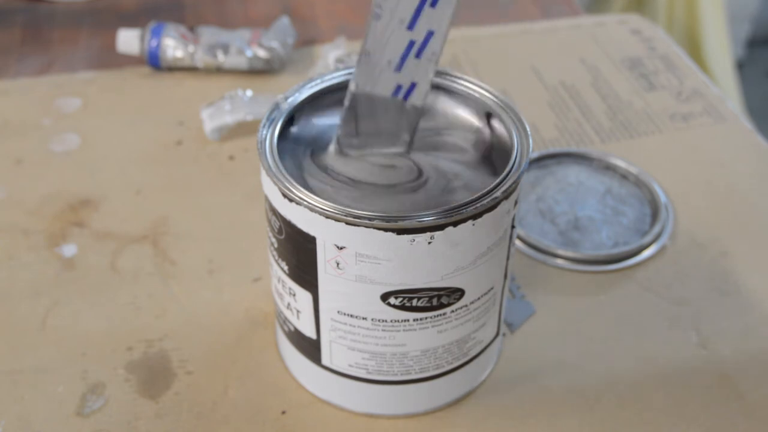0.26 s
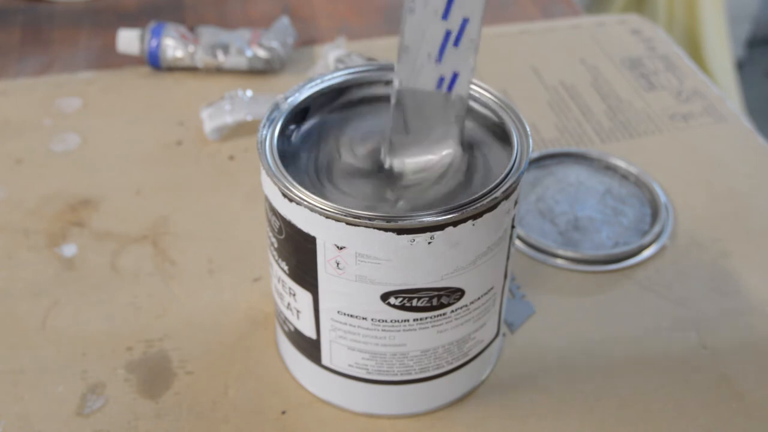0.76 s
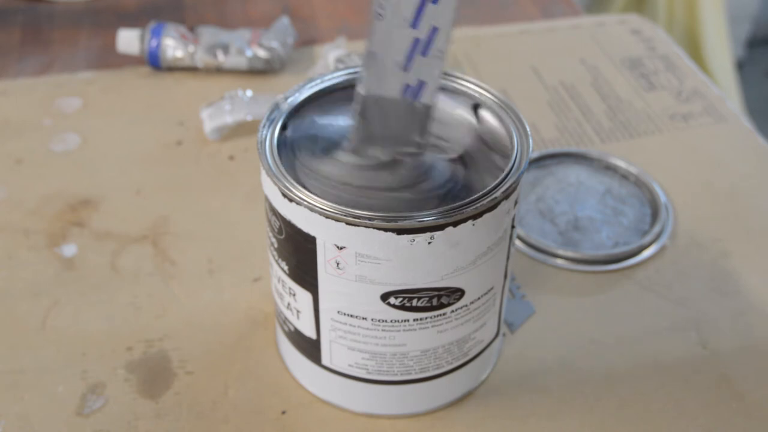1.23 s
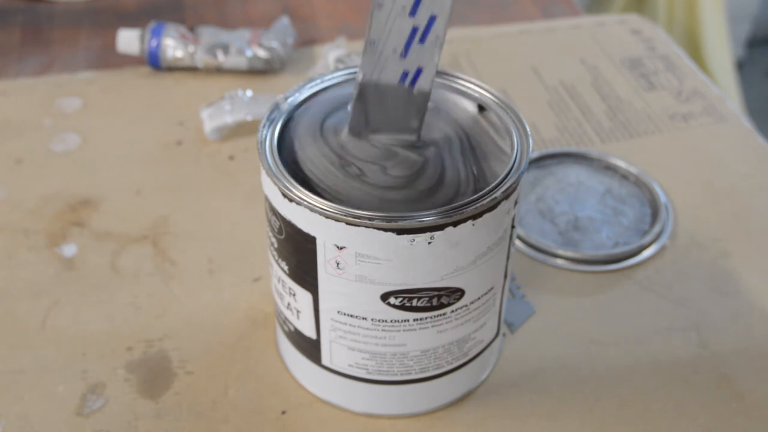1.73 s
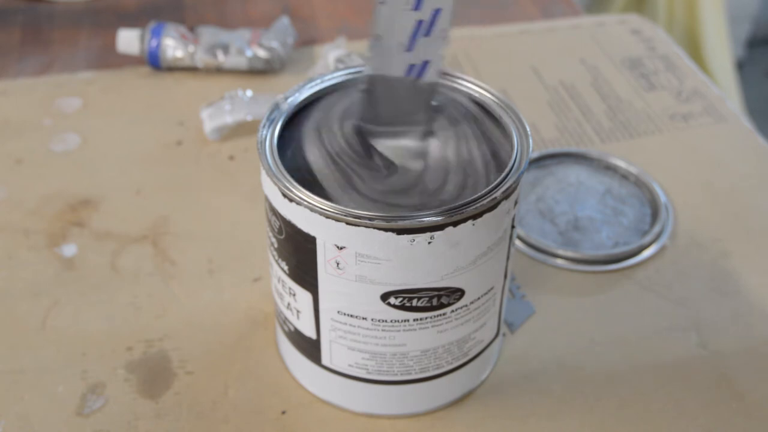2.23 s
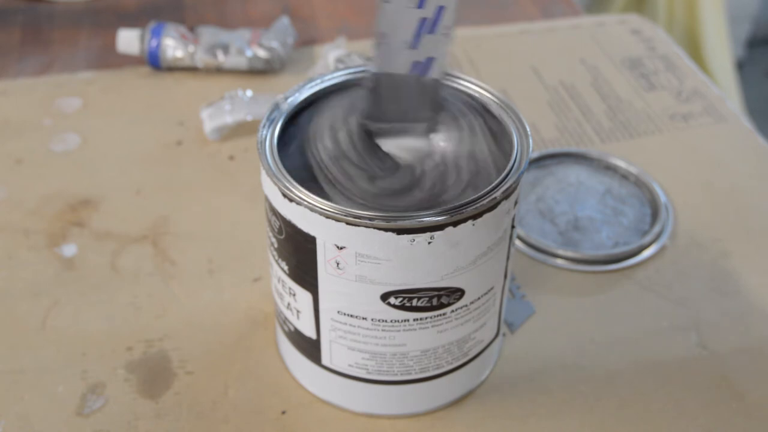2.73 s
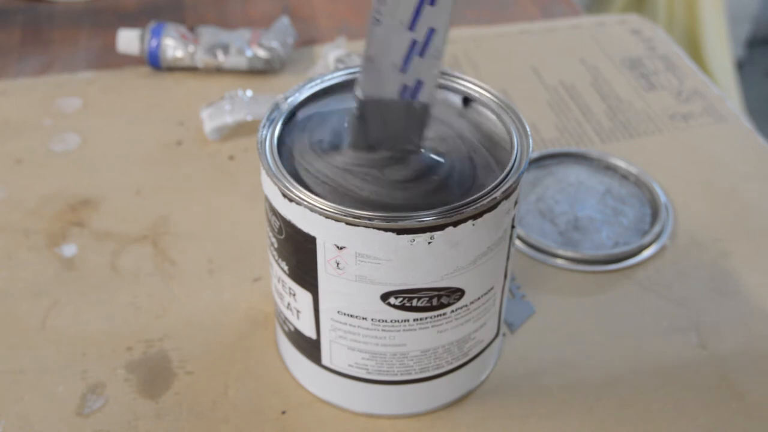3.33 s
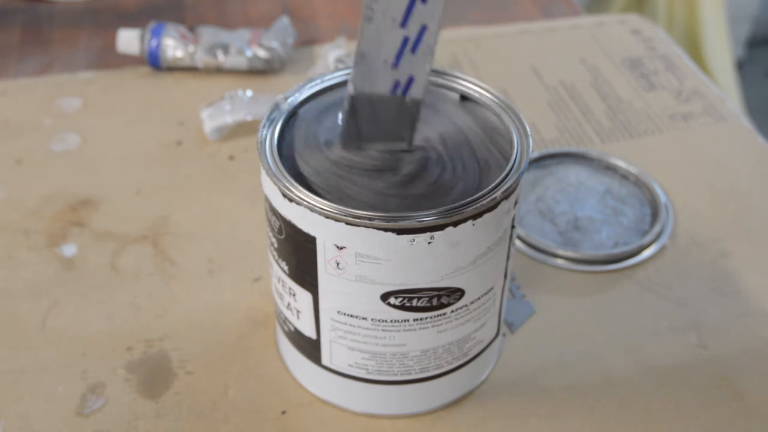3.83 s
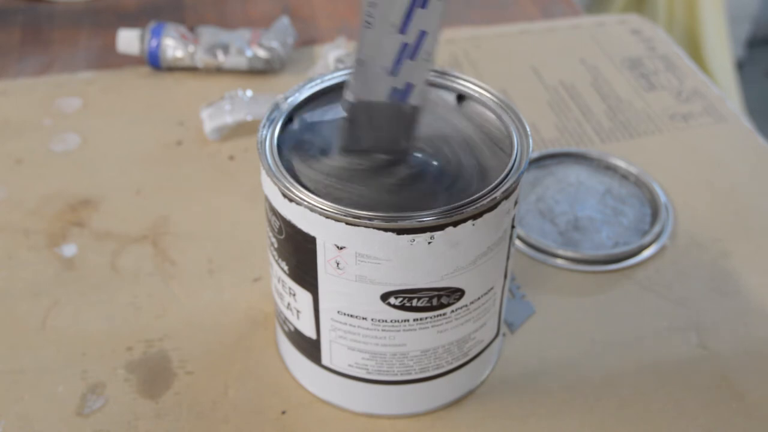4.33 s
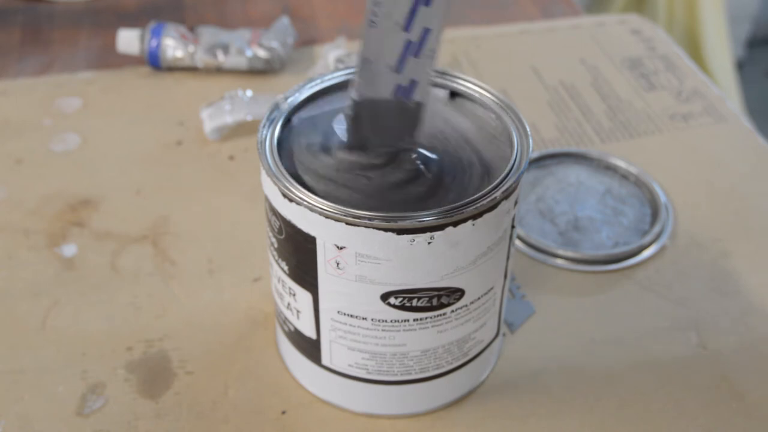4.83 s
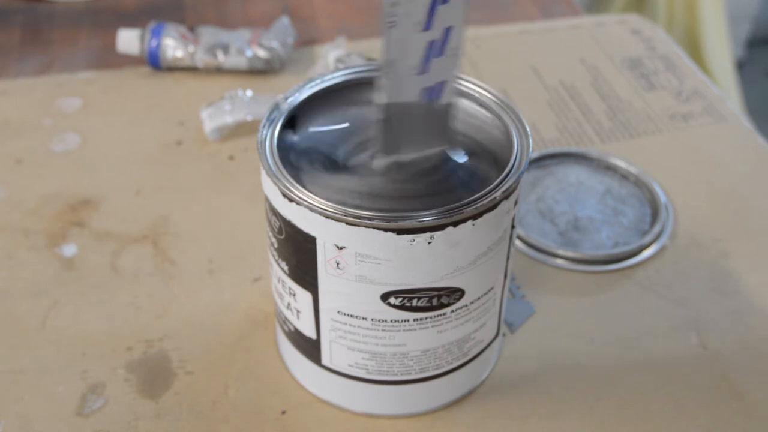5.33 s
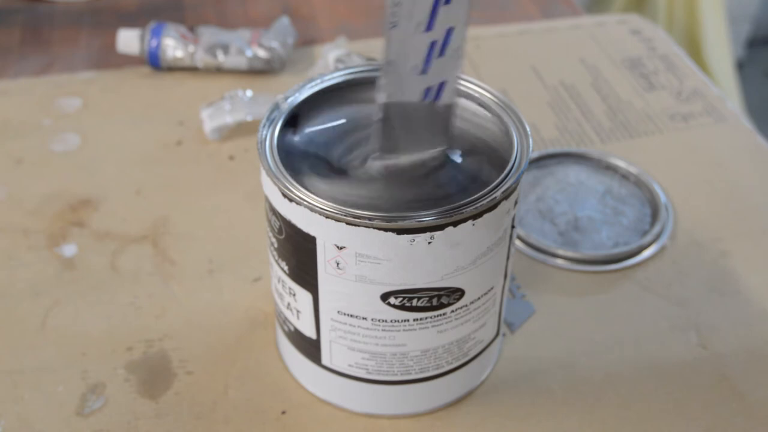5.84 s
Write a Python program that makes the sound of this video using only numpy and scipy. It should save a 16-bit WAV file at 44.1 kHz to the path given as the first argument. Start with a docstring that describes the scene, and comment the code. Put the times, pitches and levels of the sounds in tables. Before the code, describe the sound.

Close up in a small, quiet workshop, a stick scrapes round and round inside a metal can of paint. The raspy back-and-forth strokes have a damped metallic ring and speed up to about four turns a second. Now and then the stick catches with a brief low plop or high chirp. In the second half the strokes get sharper, ending with two low thumps as the can skids on the bench.

```python
"""A flat stick stirs thick paint in a metal tin, close and mono, over the hum of a small workshop.
It starts gently: each turn the edge scrapes the wall, pushing then pulling, while the tip drags over
the bottom. Now and then the stick catches and the tin rings with a brief low plop or high chirp.
The pace rises to about four turns a second. Near 4 s the hand bears down and the pushes begin to slap.
At 5.8 s and 6 s the last two make the tin judder on the bench."""
import sys
import numpy as np
from scipy import signal
from scipy.fft import rfft, irfft, next_fast_len
from scipy.io import wavfile
from scipy.ndimage import map_coordinates

SR = 44100
rng = np.random.default_rng(int(sys.argv[2]) if len(sys.argv) > 2 else 0)


def digitize_waveform(pressure):
    """Quantize a signal to 16-bit integers and store it at the path in sys.argv[1].

    Rows of a 2-D input are taken as channels; values are limited to [-1, 1].
    """
    field = np.atleast_2d(pressure).T
    bounded = np.clip(field, -1, 1)
    quanta = np.round(bounded * 32767).astype(np.int16)
    wavfile.write(sys.argv[1], SR, quanta)


N = 268128
SLAP_S = 0.00035  # contact rise at full effort


# edge pushed along the wall:
# (start [s], end [s], level [dB], hiss re level [dB], hardest point [0-1 of stroke])
PUSHES = [(-.06, .005, -33.5, -8, 1), (.31, 0.412, -46.5, -1.5, 0.79), (0.676, 0.734, -32, -7, 0.38),
          (0.951, 1.029, -31, -5, 0.45), (1.257, 1.316, -28.5, -5.5, 0.44),
          (1.53, 1.603, -30.5, -8.5, 0.59), (1.828, 1.872, -30, -10.5, 0.7), (2.058, 2.145, -33, -10, 0.58),
          (2.334, 2.402, -35, -8.5, 0.8), (2.605, 2.672, -31, -13.5, 0.94), (2.855, 2.938, -32.5, -7, 0.78),
          (3.115, 3.195, -32, -5.5, 0.79), (3.368, 3.439, -30, -7.5, 0.93), (3.617, 3.686, -31.5, -5, 0.69),
          (3.866, 3.938, -32.5, -8.5, 0.96), (4.113, 4.184, -31.5, -3, 0.7), (4.364, 4.443, -31, -3, .7),
          (4.608, 4.683, -33, 0.5, 0.57), (4.85, 4.927, -31.5, -3.5, 0.69), (5.082, 5.159, -30, -3.5, 0.71),
          (5.32, 5.398, -28, -5, 0.69), (5.556, 5.644, -29, -5, 0.71), (5.788, 5.868, -28, -6, 0.83),
          (6.003, 6.1, -28, -5.5, 1)]

def pushes(glide_in_s=0.0085, fall_s=0.0052, hiss_lead=0.38):
    """A push hisses first, while it is fastest, then presses harder and rasps."""
    out = np.zeros(N)
    for start, end, db, hiss_db, hardest in PUSHES:
        span, t, progress = stroke(start, end)
        touch = contact(t, start, end, SLAP_S + glide_in_s * gentleness(start), fall_s)
        ring = damped(db + 1, ceiling_db=-31.5) * touch * swell(progress, hardest) ** 0.12
        rasp = amp(db) * touch * swell(progress, hardest) ** 0.59
        hiss = amp(db + hiss_db) * touch * swell(progress, hardest - hiss_lead) ** 1.17
        out[span] += scrape(progress, ring, rasp, hiss, pushed=True, sweeps_db_oct=(-11, -4, -2))
    return out


# edge pulled back along the far side:
# (start [s], end [s], level [dB], hiss re level [dB], hardest point [0-1 of stroke])
PULLS = [(0.077, 0.198, -28, -6, 0.42), (0.469, 0.557, -28, -10, 0.37), (0.775, 0.861, -28.5, -8.5, 0.63),
         (1.079, 1.16, -30, -9.5, 0.54), (1.385, 1.453, -30, -8, 0.31), (1.657, 1.731, -33.5, -5.5, 0.71),
         (1.929, 1.999, -30, -3, 0.66), (2.196, 2.265, -31, -2.5, 0.77), (2.467, 2.535, -30, -4, 0.72),
         (2.717, 2.788, -31.5, -2, 0.82), (2.975, 3.059, -34, -0.5, 0.69), (3.239, 3.307, -32, -3, 0.61),
         (3.494, 3.556, -32.5, -1, .5), (3.748, 3.806, -31.5, -1, 0.44), (3.998, 4.051, -31.5, -2, 0.33),
         (4.241, 4.29, -29.5, -2.5, 0.66), (4.474, 4.519, -29, -4, 1), (4.728, 4.775, -30, -2, 0.89),
         (4.953, 5.018, -30, -7, 0.67), (5.2, 5.241, -31.5, -1.5, 0.79), (5.439, 5.478, -30, -4, 0.59),
         (5.68, 5.714, -25, -6, 0.71), (5.905, 5.941, -21.5, -11.5, 0.51)]

def pulls(rise_s=0.011, fall_s=0.006, flick_s=0.002, ring_lead_s=0.018):
    """A pull swells in and its ring sweeps up; with effort it rings earlier and ends in a flick."""
    out = np.zeros(N)
    for start, end, db, hiss_db, hardest in PULLS:
        span, t, progress = stroke(start, end)
        hard = effort(start)
        release_s = fall_s * (1 - hard) + flick_s * hard
        touch = contact(t, start, end, rise_s, release_s)
        early_touch = contact(t, start - ring_lead_s * hard ** 2, end, rise_s, release_s)
        ring = damped(db, ceiling_db=-35) * early_touch
        rasp = amp(db) * touch * swell(progress, hardest) ** 0.53
        hiss = amp(db + hiss_db) * touch * swell(progress, hardest) ** 1.04
        out[span] += scrape(progress, ring, rasp, hiss, pushed=False, sweeps_db_oct=(25, 21 * hard, -14))
    return out


# ring, rasp and hiss bands of the wall: (low [Hz], high [Hz])
WALL_BANDS = [(1680, 2600), (2600, 6400), (6400, 15000)]

def scrape(progress, ring, rasp, hiss, pushed, sweeps_db_oct, spots=5):
    """The edge slips across spots on the wall, tilting the mode balance and squeezing out air."""
    size = len(progress)
    friction = slips(size, rate_hz=2400, spread_db=2.5, noise=0.54,
                     catch_hz=230, catch_gain=1.47, catch_s=0.0025)
    out = np.zeros(size)
    for drive, band, sweep in zip((ring, rasp, hiss), WALL_BANDS, sweeps_db_oct):
        for place in np.linspace(0, 1, spots):
            distance = abs(np.clip(progress, 0, 1) - place) * (spots - 1)
            share = np.sqrt(np.maximum(0, 1 - distance))
            response = wall_spot(band, pushed, tilt_db_oct=sweep * (place - 0.5))
            out += signal.fftconvolve(drive * friction * share, response)[:size]
    out += amp(0.5) * bubbles(rasp, rate_hz=90, centre_hz=4416, scatter=0.165, life_cycles=19)
    out += amp(-2.5) * bubbles(hiss, rate_hz=160, centre_hz=9850, scatter=0.17, life_cycles=34)
    return out


# paint-damped wall modes: (frequency [Hz], width [Hz], pushed gain [dB], pulled gain [dB])
WALL_MODES = [(1866, 213, 7.5, 4), (1910, 295, 5.5, 0.5), (2167, 325, 0, 2.5), (2178, 165, 3, -2.5),
              (2896, 264, -7.5, -7.5), (3216, 450, -12.5, -1.5), (3617, 122, -1, -1), (3968, 137, -4, 1.5),
              (4366, 107, -5, -4), (4690, 120, -9.5, 1.5), (5062, 480, -1, 2), (5526, 63, -13, 0),
              (5937, 114, -8, -7), (6756, 225, -10, -6.5), (7430, 124, -7.5, -2), (7645, 200, -11, -0.5),
              (8090, 67, -2.5, 0.5), (8600, 170, -5, -17), (9570, 244, -5.5, -5.5), (10010, 1400, -21, -26),
              (10600, 810, -16, -15), (11380, 230, -13.5, -14), (12100, 280, -40, -25),
              (13170, 220, -20.5, -34), (14800, 500, -34, -86)]

def wall_spot(band, pushed, tilt_db_oct, vary_db=5.5, detune=0.02, width_scale=0.52):
    """Impulse response of one wall band at one spot; the seam splits each mode into a close pair."""
    low_hz, high_hz = band
    modes = []
    for hz, width_hz, push_db, pull_db in WALL_MODES * 2:
        if low_hz < hz < high_hz:
            split_hz = hz * (1 + detune * rng.normal())
            db = (push_db if pushed else pull_db) + tilt_db_oct * np.log2(hz / low_hz)
            modes.append((split_hz, width_scale * width_hz, db + vary_db * rng.normal()))
    bandpass = signal.butter(2, band, "band", fs=SR, output="sos")
    response = signal.sosfilt(bandpass, ringing(modes, size=1024))
    return response / np.linalg.norm(response)


# bottom modes: (frequency [Hz], width [Hz], gain [dB], strongest at [0-1 of turn])
BOTTOM_MODES = [(258, 36, -22.5, 0.93), (644, 430, -8, 1), (803, 46, 2.5, 0.95), (823, 135, 4.5, 0.36),
                (1025, 56, 3.5, 0.3), (1275, 238, 4, 0.2), (1473, 1170, 2.5, 0.24), (1813, 72, 3.5, 0.64),
                (2030, 210, -4, 0.22), (3900, 1200, 0, 0.08), (4900, 100, -0.5, 0.75),
                (8800, 150, -2, 0.72)]

def tip(focus_db=8.5, muffle_hz=9000):
    """The tip circles over the bottom and wakes its modes in turn; the paint muffles the treble."""
    edges_s = np.sort(np.array(PUSHES + PULLS)[:, :2].ravel())
    turn = np.interp(np.arange(N) / SR, edges_s, np.arange(len(edges_s)) / 4)  # push 0-.25, pull .5-.75
    force = np.hypot(drag(), shake(PULLS, share_db=-9, ceiling_db=-42, weight_db=-9, width=0.45))
    force *= slips(N, rate_hz=810, spread_db=2.5, noise=0.95, catch_hz=50, catch_gain=2.9, catch_s=0.017)
    gains = np.array([amp(db + focus_db * np.cos(2 * np.pi * (turn - strongest)))
                      for _, _, db, strongest in BOTTOM_MODES])
    gains /= np.linalg.norm(gains, axis=0)
    rub = np.zeros(N)
    for k, (hz, width_hz, _, _) in enumerate(BOTTOM_MODES):
        rub += (-1) ** k * signal.fftconvolve(force * gains[k], ringing([(hz, width_hz, 0)]))[:N]
    return filtered(rub, lambda hz: 1 / np.hypot(1, (hz / muffle_hz) ** 2))


def drag(base_db=-46.5, weight_db=16, graze_db=-57, lead_s=0.019, glide_in_s=0.0079, lift_s=0.0047):
    """Tip force: lands as a push nears, eases off, lifts after the pull; still grazes when gentle."""
    t = np.arange(N) / SR
    force = amp(graze_db) * (1 - effort(t))
    starts = [start for start, *_ in PUSHES]
    lifts = [end for _, end, *_ in PULLS] + [starts[-1] + np.median(np.diff(starts))]
    for start, lift in zip(starts, lifts):
        progress = np.clip((t - start) / (lift - start), 0, 1)
        fade_db = (8 + 15 * effort(start)) * progress
        gentle = gentleness(start)
        touch = contact(t, start - lead_s * gentle, lift, SLAP_S + glide_in_s * gentle, lift_s)
        force += amp(base_db + weight_db * weight(start) - fade_db) * touch
    return force


def hollow(low_hz=1000, high_hz=1700):
    """Each push sounds the hollow of the tin: the bottom's middle modes, shaken through the wall."""
    force = shake(PUSHES, share_db=-6, ceiling_db=-41, weight_db=4.5, width=0.33)
    force *= slips(N, rate_hz=1500, spread_db=3, noise=0.7, catch_hz=120, catch_gain=1.3, catch_s=0.0036)
    modes = [(hz, width_hz, db) for hz, width_hz, db, _ in BOTTOM_MODES if low_hz < hz < high_hz]
    return signal.fftconvolve(force, ringing(modes))[:N]


def shake(strokes, share_db, ceiling_db, weight_db, width):
    """Force passed from wall to bottom at mid-stroke; the hand's weight shifts its ceiling."""
    force = np.zeros(N)
    for start, end, db, *_ in strokes:
        span, _, progress = stroke(start, end)
        peak = damped(db + share_db, ceiling_db + weight_db * weight(start))
        force[span] += peak * np.exp(-((progress - 0.5) / width) ** 2)
    return force


# how hard the hand stirs: (time [s], effort [0-1])
EFFORT = [(0, 0), (0.8, 0), (1.3, 0), (2.1, 0.01), (2.7, 0.06), (3.4, 0.04), (3.9, 0.12), (4.2, 0.79),
          (5.1, 0.79), (5.55, 0.87), (5.76, 1)]

def effort(time_s):
    """Stirring effort, 0-1."""
    return np.interp(time_s, *np.transpose(EFFORT))


def gentleness(time_s):
    """1 while the hand guides the stick in, 0 when it slaps."""
    return 1 - effort(time_s) ** 4


def weight(time_s):
    """Share of the hand's weight on the bottom; saturates with effort."""
    return np.tanh(effort(time_s) / 0.44)


def stroke(start_s, end_s):
    """Sample indices, times and progress (0-1 in contact) around one stroke."""
    span = np.arange(max(0, int(start_s * SR) - SR // 10), min(N, int(end_s * SR) + SR // 10))
    t = span / SR
    return span, t, (t - start_s) / (end_s - start_s)


def contact(t, start_s, end_s, rise_s, fall_s):
    """The stick presses on, holds and lifts off."""
    press = (1 + np.tanh((t - start_s) / (2 * rise_s))) / 2
    lift = (1 + np.tanh((end_s - t) / (2 * fall_s))) / 2
    return press * lift


def swell(progress, peak_at):
    """A hump over the stroke."""
    return 1 / (1 + (2 * (np.clip(progress, -0.4, 1.4) - peak_at)) ** 2)


def damped(db, ceiling_db):
    """Gain of a low ring: grows with the stroke until the paint caps it."""
    return 1 / np.hypot(amp(-db), amp(-ceiling_db))


def slips(size, rate_hz, spread_db, noise, catch_hz, catch_gain, catch_s):
    """Friction at rms 1: tiny uneven slips, with catches that let go in fading bursts."""
    hits = (rng.random(size) < rate_hz / SR) * rng.choice([-1, 1], size)
    hits = hits * amp(spread_db * np.clip(rng.standard_normal(size), -2, 2))
    catches = (rng.random(size) < catch_hz / SR).astype(float)
    bursts = signal.lfilter([1], [1, -np.exp(-1 / (catch_s * SR))], catches)
    grain = unit(hits) + noise * rng.standard_normal(size)
    return unit(grain * np.sqrt(1 + catch_gain ** 2 * bursts))


# tin skidding on the bench: (time [s], length [s], base level [dB], knock level [dB], thump [Hz])
JUDDERS = [(5.791, 0.052, -33.5, -6, 268), (6.002, 0.1, -34.5, -9, 258.3)]
# bench modes: (frequency [Hz], width [Hz], gain [dB])
BENCH_MODES = [(148, 80, -7.5), (343, 16, 8), (517, 540, -4.5), (840, 270, 0.5)]

def judder():
    """The stick slaps the wall and skids the tin in quick hops that thump the bench."""
    out = np.zeros(N + SR)
    t = np.arange(SR // 2) / SR
    rocking = (1 - np.exp(-t / 0.018)) * np.exp(-t / 0.026)  # the heavy tin rocks and settles
    wall_ring = ringing([(hz, width_hz, push_db) for hz, width_hz, push_db, _ in WALL_MODES])
    for start, length_s, db, knock_db, thump_hz in JUDDERS:
        size = int(length_s * SR)
        hops = slips(size, rate_hz=250, spread_db=0.5, noise=0.4,
                     catch_hz=90, catch_gain=1, catch_s=0.0042)
        fade = amp(db + np.linspace(-2, -14, size))
        chatter = signal.fftconvolve(fade * hops, ringing(BENCH_MODES))
        thump = amp(db + 12) * rocking * np.sin(2 * np.pi * thump_hz * t + 0.62 * wobble(69, len(t)))
        knock = amp(knock_db) * wall_ring
        for part in (chatter, thump, knock):
            out[int(start * SR):][:len(part)] += part
    return out[:N]


# single catches that ring the tin: (time [s], level [dB], pitch [Hz], decay [s])
CATCH_RINGS = [(.632, -26, 793, 0.0064), (.821, -15, 5300, 0.0014), (.824, -16.5, 7940, 0.0033),
               (2.338, -31.5, 820, 0.012), (2.597, -28, 768, 0.01), (3.372, -26.5, 810, 0.0057),
               (4.097, -23, 807, 0.0045), (4.257, -18.5, 5200, 0.0033), (4.507, -16, 5150, 0.0016),
               (5.924, -17, 4740, 0.0032), (5.93, -13, 4360, 0.0029), (5.936, -10, 5000, 0.0015)]

def catch_rings(size=2048):
    """The stick catches and the tin rings: brief low plops and high chirps."""
    out = np.zeros(N + size)
    for start, db, hz, decay_s in CATCH_RINGS:
        out[int(start * SR):][:size] += amp(db) * ping(hz, decay_s, size, rise_cycles=3.1)
    return out[:N]


def bubbles(drive, rate_hz, centre_hz, scatter, life_cycles, size=600):
    """Air squeezed from under the stick bursts as tiny bubbles."""
    onsets = np.flatnonzero(rng.random(len(drive)) < rate_hz / SR)[:, None]
    pitch, loudness = np.clip(rng.standard_normal((2, len(onsets), 1)), -2, 2)
    hz = centre_hz * np.exp(scatter * pitch)
    pings = drive[onsets] * amp(2 * loudness) * ping(hz, life_cycles / hz, size, rise_cycles=0.33)
    samples = onsets + np.arange(size)
    return np.bincount(samples.ravel(), pings.ravel(), len(drive))[:len(drive)]


def ping(hz, decay_s, size, rise_cycles, glide=0.016):
    """A short tone swells, rises in pitch and dies."""
    t = np.arange(size) / SR
    envelope = (1 - np.exp(-hz * t / rise_cycles)) * np.exp(-t / decay_s)
    return envelope * np.sin(2 * np.pi * hz * t * (1 + glide * t / decay_s))


# room decay: (frequency [Hz], T60 [s])
ROOM_T60 = [(200, 0.31), (2000, 0.3), (6000, 0.2), (14000, 0.051)]

def room(x):
    """The workshop walls answer after 5 ms, the treble dying first."""
    hz, t, spectrum = signal.stft(rng.standard_normal(SR // 2), SR, nperseg=256)
    decay = amp(-60 * t / log_interp(ROOM_T60, hz)[:, None])
    _, tail = signal.istft(spectrum * decay, SR, nperseg=256)
    tail = np.pad(tail, (SR // 200, 0))
    return signal.fftconvolve(x, tail / np.linalg.norm(tail))[:N]


# air noise spectrum: (frequency [Hz], relative density [dB])
AIR_SPECTRUM = [(25, -30), (55, -19), (100, -8.5), (160, -5), (220, -4), (275, 2), (400, -6.5), (800, 0),
                (2000, -11.5), (6000, -9), (15000, -28)]
# electrical hum: (frequency [Hz], rms level [dB])
HUM_TONES = [(60, -83), (120, -76.5), (180, -77), (277, -70)]

def workshop(air_db=-55):
    """Steady air noise and a faint electrical hum."""
    t = np.arange(N) / SR
    air = filtered(rng.standard_normal(N), lambda hz: amp(log_interp(AIR_SPECTRUM, hz)))
    hum = sum(amp(db) * np.sqrt(2) * np.sin(2 * np.pi * hz * t + 0.087 * wobble(3.01, N))
              for hz, db in HUM_TONES)
    return amp(air_db) * unit(air) + hum


def ringing(modes, size=4096):
    """Unit-energy impulse response of modes (frequency [Hz], width [Hz], gain [dB])."""
    f = np.fft.rfftfreq(size, 1 / SR)
    spectrum = sum((-1) ** k * amp(db) * 1j * f * width_hz / (hz * hz - f * f + 1j * f * width_hz)
                   for k, (hz, width_hz, db) in enumerate(modes))
    response = irfft(spectrum)
    return response / np.linalg.norm(response)


def amp(db):
    """Decibels to gain."""
    return 10 ** (np.asarray(db) / 20)


def unit(x):
    """Scale to rms 1."""
    return x / np.sqrt(np.mean(x ** 2) + 1e-20)


def log_interp(points, hz):
    """Interpolate (frequency [Hz], value) points on a log axis."""
    knots_hz, values = np.transpose(points)
    return np.interp(np.log(hz + 1), np.log(knots_hz + 1), values)


def wobble(rate_hz, size):
    """Smooth random curve."""
    knots = rng.standard_normal(int(size * rate_hz / SR) + 4)
    return map_coordinates(knots, [np.arange(size) * rate_hz / SR])


def filtered(x, response):
    """Apply a frequency response."""
    size = next_fast_len(N + SR // 2)
    return irfft(rfft(x, size) * response(np.fft.rfftfreq(size, 1 / SR)), size)[:N]


def scene(room_db=-20.5):
    """The tin and its room, alike in both channels."""
    tin = pushes() + pulls() + tip() + hollow() + judder() + catch_rings()
    highpass = signal.butter(2, 70, "high", fs=SR, output="sos")  # a small tin radiates no deep bass
    tin = signal.sosfilt(highpass, tin)
    mono = tin + amp(room_db) * room(tin) + workshop()
    return np.array([mono, mono])


def record(dry, cutoff_hz=15700):
    """Brick-wall low-pass."""
    return np.array([filtered(channel, lambda hz: hz < cutoff_hz) for channel in dry])


dry = scene()
out = record(dry)
digitize_waveform(out)
```